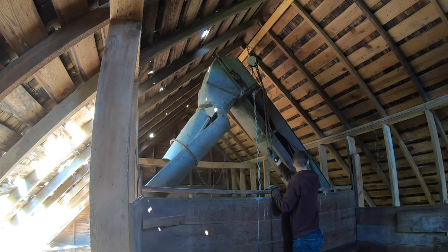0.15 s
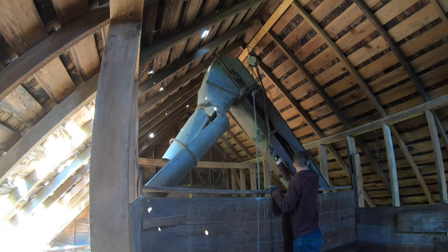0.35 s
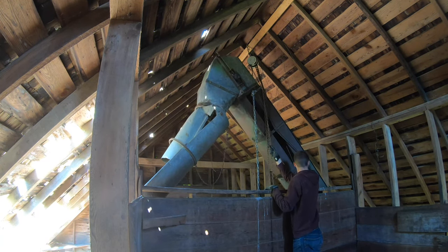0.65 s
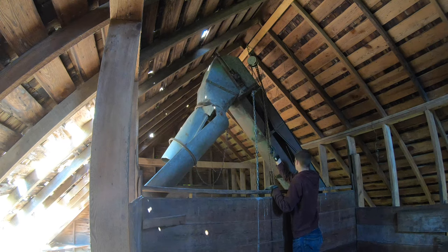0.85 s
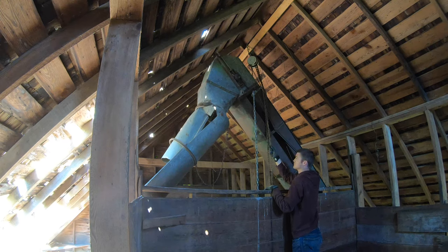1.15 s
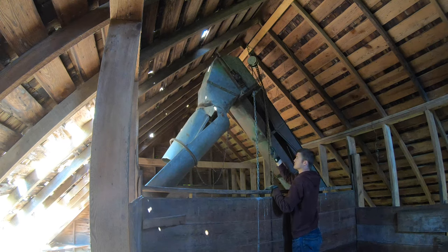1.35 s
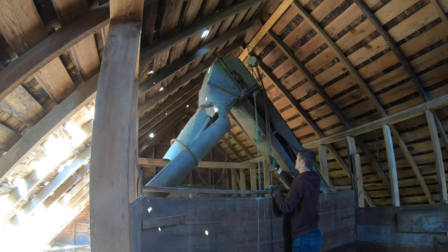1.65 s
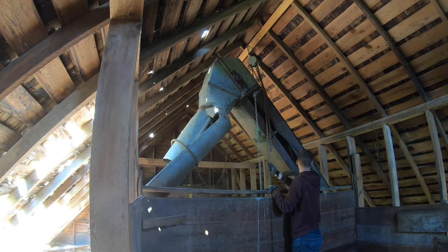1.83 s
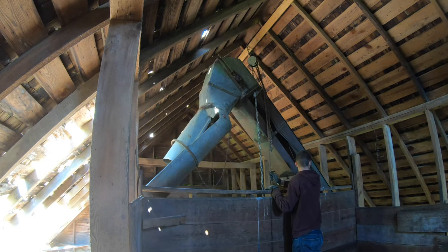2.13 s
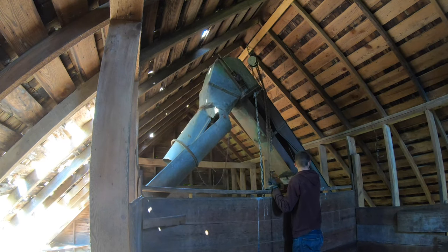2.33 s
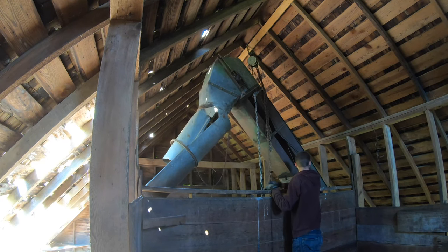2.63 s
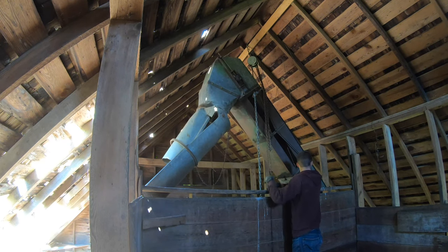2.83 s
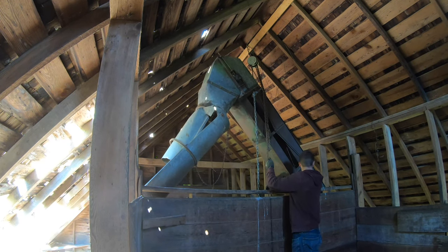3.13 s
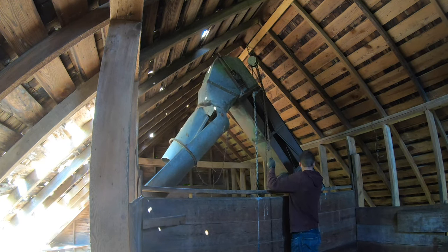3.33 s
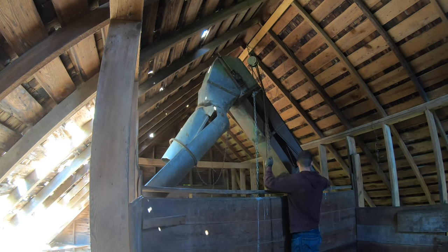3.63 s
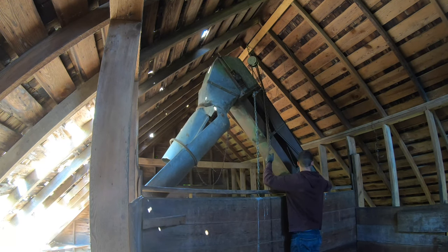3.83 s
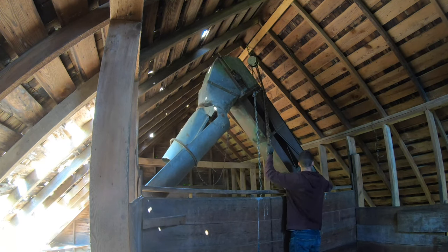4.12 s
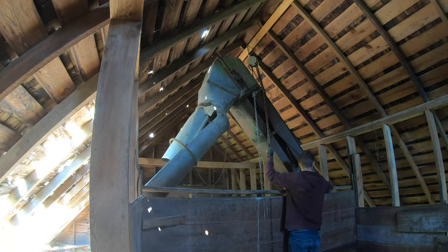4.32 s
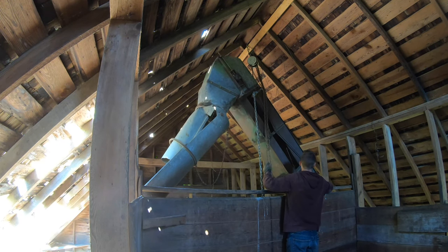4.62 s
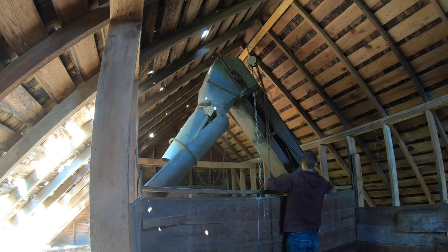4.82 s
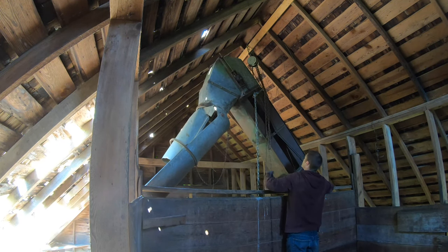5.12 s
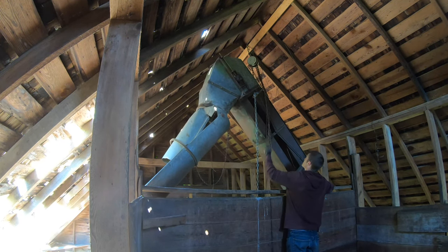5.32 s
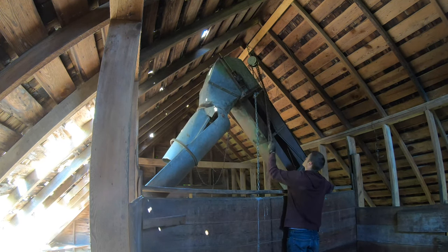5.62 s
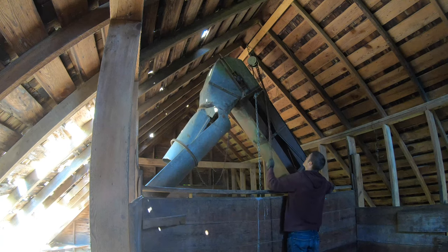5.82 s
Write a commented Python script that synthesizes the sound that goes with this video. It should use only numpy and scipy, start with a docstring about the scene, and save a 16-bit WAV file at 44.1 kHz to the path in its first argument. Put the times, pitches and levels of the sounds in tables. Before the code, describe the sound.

Under the roof of a large wooden barn, a hand chain is pulled through a hoist, heard from some distance. For the first 1.5 seconds the chain hangs slack: quiet, scattered metallic knocks and faint ticks over low timber rumble. At about 1.5 s a pull starts abruptly, links rattling densely over the wheel with bright clanks from the casing and ringing metal tones, until about 2.6 s. A small shorter rattle follows near 2.85 s, then a near-quiet pause with soft dull bumps from 3 to 4.3 s. At 4.4 s a second strong pull clatters until about 5.1 s, fading into loose knocks. From 5.6 s a third pull builds, with planks booming deeper beneath it, and is still running at the end near 6 s. Short, diffuse wooden reverberation surrounds everything; soft low wind lumps touch the microphone, slightly stronger on the right.

```python
"""Under the roof of a big timber barn a hand chain is hauled through a hoist, in pulls with pauses between.
Links rattle over the wheel, the casing clanks, the beams boom along; slack chain knocks about in the pauses.
Random touches and single knocks drive each part through noise echoes with ringing modes, one set per path.
All of it is heard from a distance, mostly as the barn's reverberation; low noise makes wind on the microphone."""
import sys
import numpy as np
from scipy import signal
from scipy.fft import rfft, irfft, next_fast_len
from scipy.io import wavfile

SR = 44100
rng = np.random.default_rng(int(sys.argv[2]) if len(sys.argv) > 2 else 0)


def inscribe(sig):
    """Save sig as 16-bit PCM at rate SR to the path in sys.argv[1].

    A 1-D sig is mono; a 2-D sig holds one channel per row.
    Samples are clipped to [-1, 1] before scaling.
    """
    pcm = np.round(np.clip(np.atleast_2d(sig).T, -1, 1) * 32767)
    wavfile.write(sys.argv[1], SR, pcm.astype(np.int16))


def nominal_scale(level):
    """Amplitude ratio for a level in decibels (scalar or array-like)."""
    x = np.asarray(level, float) / 20
    return 10 ** x


N = 262836   # samples


def rms_one(x):
    """Scales a signal to an rms of 1."""
    return x / np.sqrt(np.mean(x ** 2) + 1e-20)


def in_time(rows):
    """Draws each column after the time [s] as a curve over the whole scene."""
    s, *columns = np.transpose(rows)
    return [np.interp(np.arange(N) / SR, s, column) for column in columns]


def at_hz(points, hz):
    """Reads a curve over log frequency."""
    curve_hz, values = np.array(points).T
    return np.interp(np.log(hz), np.log(curve_hz), values)


def band(x, low_hz, high_hz, order=2):
    """Butterworth band-pass."""
    return signal.sosfilt(signal.butter(order, [low_hz, high_hz], "band", fs=SR, output="sos"), x)


def resonance(x, hz, width_hz):
    """One ringing mode: two poles, gain 1 on top."""
    r = np.exp(-np.pi * width_hz / SR)
    feedback = [1, -2 * r * np.cos(2 * np.pi * hz / SR), r * r]
    return signal.lfilter([(1 - r * r) / 2, 0, (r * r - 1) / 2], feedback, x)


def rattle(links_db, uneven_db=3.5, blend_db=5.5):
    """Links touch at random moments with uneven force, more often the harder the chain runs."""
    running_per_s, slack_per_s, running_from_db = 600, 120, -40
    running = 1 / (1 + np.exp((running_from_db - links_db) / blend_db))   # 0 slack, 1 running
    per_s = slack_per_s + (running_per_s - slack_per_s) * running
    force = nominal_scale(uneven_db * np.minimum(rng.exponential(1, N), 4)) * rng.choice([-1, 1], N)
    touching = rng.random(N) < per_s / SR
    return rms_one(force) * touching * np.sqrt(SR / per_s)   # equally strong at any rate


def running_levels(links_db, timber_db):
    """Each part follows the links, the timber or a blend of both while the chain runs; the floor shakes by itself."""
    # beam, planks, wheel, casing: (share that follows the timber rather than the links [0-1], offset [dB])
    blends = [(1, 2), (0.85, -4.5), (0.56, 1), (0.26, 1)]
    # late in the last pull the planks boom along: (time [s], extra level [dB])
    planks_drum = [(0, 1.5), (5.7, 0.5), (5.73, 10), (5.96, 7.5)]
    # the floor shaking: (time [s], level before the haul gain [dB])
    floor_shake = [(0.0, -46.5), (0.51, -65), (0.58, -55), (0.7, -98), (1.53, -70), (1.59, -54),
                   (2.51, -44.5), (2.74, -61), (2.8, -56), (3.15, -77), (3.4, -51.5), (3.65, -78),
                   (4.55, -50), (4.61, -38), (5.58, -52.5), (5.96, -38)]
    ticks_db, ticks_grow = -1, 0.12   # re links at 0 dB; ticks sharpen as the chain runs harder [dB per dB]

    parts = [links_db + share * (timber_db - links_db) + db for share, db in blends]
    parts[1] += in_time(planks_drum)[0]
    ticks = links_db + ticks_db + ticks_grow * links_db
    return [in_time(floor_shake)[0], *parts, links_db, ticks]


def knocks():
    """Single blows of metal; a heavy one moves the floor, timber, wheel and casing more. Gives samples and levels."""
    # single knocks, before the knock gain:
    # (time [s], peak [dB], sharp ticks re peak [dB], weight re peak [dB])
    blow_rows = np.array([(0.0624, -50, -17, -20), (0.1349, -47.5, -6, 6), (0.178, -36, -17, -0.5),
                          (0.349, -37, -4.5, -18), (0.3581, -34.5, -6, 2.5), (0.4516, -31.5, -14, -6),
                          (0.486, -38.5, -9, -9), (0.546, -43, -13, 21), (0.634, -50, -12, 8.5),
                          (0.7704, -68, 18, -20), (0.851, -39, -0.5, 1.5), (1.0036, -51, -10, -5),
                          (1.1055, -52, -24, -1), (1.1684, -45, -6, -3), (1.2191, -77, -10, -17),
                          (1.3784, -41.5, -17, 6.5), (1.5013, -34, -12.5, 6), (1.5427, -27.5, -31, -10),
                          (1.5593, -14, -3, -13), (1.6694, -19.5, 4.5, -5.5), (1.763, -17, 0.5, -7.5),
                          (1.8763, -25.5, -1.5, 1), (1.9114, -20, -3.5, -2), (2.0276, -20.5, 3.5, -1),
                          (2.1878, -26, 5, 0.5), (2.2799, -16.5, -5.5, -9), (2.3171, -24, 4, -9),
                          (2.4654, -20, -2.5, -3.5), (2.677, -28.5, -14, -13), (2.7384, -33.5, -21, -3.5),
                          (2.826, -28, -6.5, -13), (2.8702, -36, 3.5, -4), (3.015, -34, -3.5, -8.5),
                          (3.2201, -55, -8, -3), (3.288, -41, -3.5, 2), (3.358, -39.5, -28, 21),
                          (3.4197, -51.5, 8, -1), (3.692, -58, -4, -16), (3.8287, -66, 14, -7),
                          (4.0562, -40, -6, -31), (4.1005, -37, -10, -11.5), (4.1892, -56, -22, 7),
                          (4.249, -46.5, -2, -15), (4.3218, -36.5, -15, -15), (4.3949, -19.5, -8.5, -9),
                          (4.4725, -13.5, -2.5, -18), (4.5499, -19.5, 6.5, -15), (4.7706, -15, -2, -21),
                          (4.8599, -16, 0, -4), (5.0692, -21, -1, -13), (5.181, -27, -9.5, -8),
                          (5.3467, -30, -12.5, -9.5), (5.445, -36, -11, -5), (5.5074, -26, -12, -9.5),
                          (5.5753, -24.5, -27, -13), (5.615, -27, -15, 0), (5.6471, -16, 0.5, -7),
                          (5.724, -15, -2.5, -4), (5.8392, -15.5, -2.5, -9.5), (5.9289, -28, -12, -9)])
    # floor, beam, planks, wheel, casing under a knock: (share of its weight [0-1], offset [dB])
    struck = [(0.53, -9.5), (1, -9), (0.81, -8), (0.74, -0.5), (0.59, 3)]
    s, peak, tick, weight = blow_rows.T
    at = np.round(s * SR).astype(int)
    return at, [peak + share * weight + db for share, db in struck] + [peak, peak + tick]


def stereo_bands(spectrum, shape):
    """Third-octave bands of stereo noise, each with its level, likeness, balance and its shape in time."""
    # how alike left and right are, clipped to 0-1 in use: (frequency [Hz], correlation)
    likeness = [(60, 0.86), (130, 1), (290, 0.97), (640, 0.77), (1410, 0.36), (3100, 0.85), (6820, 0.25),
                (15000, -1.84)]
    # balance: (frequency [Hz], left over right [dB])
    balance = [(60, -2), (150, 0.0), (380, -0.5), (950, -2), (2380, -1.5), (5980, -0.5), (15000, -2)]
    out, edges_hz = 0, 45 * 2 ** (np.arange(27) / 3)
    # neighbouring bands use different noise; each noise has a middle and a side
    white = rng.standard_normal((2, 2, len(shape(1000.))))
    for k, (low, high) in enumerate(zip(edges_hz, edges_hz[1:])):
        hz = np.sqrt(low * high)
        mid, side = band(white[k % 2] * shape(hz), low, high)
        alike = np.clip(at_hz(likeness, hz), 0, 1)
        pan_db = at_hz(balance, hz) / 2
        pair = np.sqrt(1 + alike) * mid + np.sqrt(1 - alike) * side * [[1], [-1]]
        out = out + nominal_scale(at_hz(spectrum, hz)) * nominal_scale(np.array([[pan_db], [-pan_db]])) * pair
    return out


def ringing(x, spread_db=2.5):
    """The clatter with each mode ringing on top of it; every place of contact excites the modes differently."""
    # what rings: (frequency [Hz], width [Hz], level over the broad clatter before the random spread [dB])
    modes = [(84.8, 7.4, 2.5), (182.3, 17.4, 21.5), (342.6, 90, 10.5), (403.4, 12, 10), (527.2, 5.6, 13),
             (658.2, 19, 9.5), (697.3, 20, 7.5), (1176, 16, 0), (1360, 31, 3.5), (1525, 39, 1.5),
             (1642, 57, 4), (1970, 82, 4), (2524, 45, 7), (2810, 200, 6), (3040, 130, 8), (3253, 160, 5.5),
             (3492, 130, 9), (3820, 70, 6.5), (3790, 21, 6), (4164, 94, 5), (5400, 170, 3), (6870, 55, 3),
             (7560, 45, 6)]
    out = x.copy()
    for (hz, width_hz, db), chance in zip(modes, rng.standard_normal(len(modes))):
        out += (nominal_scale(db + spread_db * chance) - 1) * resonance(x, hz, width_hz)
    return out


def barn(direct_db=14, build_s=0.0028):
    """The answer to one click: a short direct crack, then echoes that thicken and die band by band."""
    # broad spectrum of the clatter, the modes come on top: (frequency [Hz], relative level per Hz [dB])
    clatter = [(60, -15), (85, -1), (125, -17), (190, -6.5), (300, -6), (480, -13.5), (680, -4), (1000, -6),
               (1350, 1), (2000, -5.5), (2800, -8), (3700, -10.5), (4300, -9), (7500, -3.5), (9600, -5),
               (15000, -18)]
    # reverberation: (frequency [Hz], time to fall by 60 dB [s])
    barn_t60 = [(100, 0.61), (300, 0.41), (1000, 0.39), (3000, 0.23), (6000, 0.19), (11000, 0.15)]
    t = np.arange(round(.45 * SR)) / SR

    def shape(hz):
        """Crack and echoes of one band in time."""
        t60_s = at_hz(barn_t60, hz)
        tail = (1 - np.exp(-t / build_s)) * nominal_scale(-60 * t / t60_s)
        tail /= np.sqrt(t60_s)      # equal energy in every band
        crack = nominal_scale(direct_db) * np.exp(-t / .0004)
        return tail + crack
    return ringing(stereo_bands(clatter, shape))


def hoist(count, knock_db=21, haul_db=-1.0, earlier_db=30):
    """Rattle and knocks drive all the parts; contacts at several places each have their own path through the barn."""
    # the chain running, before the haul gain: (time [s], links [dB], timber [dB])
    haul = [(0.0, -53, -43.5), (0.2, -56.5, -52.5), (0.33, -61.5, -49.5), (0.45, -57, -46),
            (0.58, -62.5, -49), (0.83, -60.5, -60), (1.0, -66.5, -57.5), (1.3, -60, -52.5),
            (1.49, -43, -39), (1.57, -25, -39), (1.87, -26.5, -39.5), (2.27, -32, -40),
            (2.45, -30.5, -42.5), (2.66, -52, -47), (2.78, -42, -39.5), (2.85, -32.5, -43.5),
            (2.92, -43, -48), (3.0, -57.5, -48), (3.17, -63, -60.5), (3.36, -53.5, -50), (3.64, -73, -65.5),
            (3.95, -56.5, -49), (4.21, -59, -55.5), (4.36, -50.5, -56), (4.42, -24, -34), (4.7, -22.5, -35),
            (5.01, -22, -37.5), (5.13, -35.5, -44), (5.33, -55.5, -50), (5.5, -57, -43), (5.6, -34.5, -40),
            (5.68, -28, -35), (5.76, -21.5, -31), (5.96, -22, -34.5)]
    # band edges [Hz] between floor, beam, planks, wheel, casing, links, ticks
    part_edges = [62, 140, 250, 550, 1000, 2200, 4500, 15500]
    flurry_db, flurry_t60_s = -14, 0.2   # each knock leaves a dying jingle of links

    links_db, timber_db = in_time(haul)
    at, hits = knocks()
    touches, place = rattle(links_db), rng.integers(0, count, N)
    place[at] = np.arange(len(at)) % count   # knocks take the places in turn
    size = next_fast_len(N + SR // 2)
    paths, total = [barn() for k in range(count)], 0
    runs = running_levels(links_db, timber_db)
    for low, high, run_db, hit_db in zip(part_edges, part_edges[1:], runs, hits):
        blows = np.zeros(N)
        blows[at] = nominal_scale(hit_db)
        decay = nominal_scale(-60 / (flurry_t60_s * SR))
        flurry = signal.lfilter([nominal_scale(flurry_db)], [1, -decay], blows + 1e-18)
        drive = touches * (nominal_scale(run_db + haul_db) + flurry) + nominal_scale(knock_db) * blows
        # echoes of the rattle just before still hang in the air: one blow at the start
        drive[0] += nominal_scale(run_db + earlier_db)[0]
        for k, path in enumerate(paths):
            answer = band(path, low, high, order=3)
            answer /= np.sqrt(np.sum(answer ** 2) / 2)   # equal energy for every part and path
            total = total + rfft(drive * (place == k), size) * rfft(answer, size)
    return irfft(total, size)[:, :N]


def wind():
    """Low lumps on the microphone ports, partly own in each channel, stronger on the right."""
    # wind on the microphone: (time [s], level before the left-right balance [dB])
    gusts = [(0.0, -49), (0.2, -43.5), (0.93, -87), (1.54, -77), (1.74, -50.5), (2.27, -53), (2.34, -41),
             (2.42, -62), (2.51, -54.5), (3.95, -86), (4.35, -48), (4.38, -67), (4.96, -48), (5.68, -79),
             (5.84, -52), (5.96, -54)]
    shared, left, right = rng.standard_normal((3, N))
    lumps = band(np.array([shared + 0.3 * left, shared + 1.1 * right]), 21, 50, order=3)
    return nominal_scale(in_time(gusts)[0]) * rms_one(lumps) * nominal_scale(np.array([[-2.4], [2.4]]))


def scene():
    """The hoist at work, with contacts at four places, and the wind."""
    return hoist(count=4) + wind()


def roll_off(x):
    """The treble ends steeply here."""
    return signal.sosfilt(signal.butter(12, 15630, fs=SR, output="sos"), x)


def record(dry):
    """A dip in the treble, then a steep edge near 10 kHz with a faint plateau above."""
    # dip in the treble: (frequency [Hz], width [Hz], depth [dB])
    treble_dip = (8460, 1100, -7)
    edge_hz, plateau_db = 10045, -14
    hz, width_hz, db = treble_dip
    dipped = dry + (nominal_scale(db) - 1) * resonance(dry, hz, width_hz)
    dull = signal.sosfilt(signal.butter(8, edge_hz, fs=SR, output="sos"), dipped)
    plateau = nominal_scale(plateau_db) * band(dry, 9600, 20800, order=4)
    return roll_off(dull + plateau)


dry = scene()
out = record(dry)
inscribe(out)
```